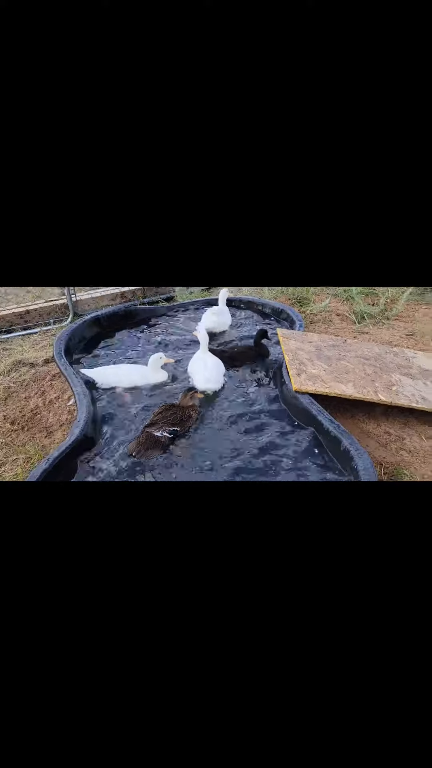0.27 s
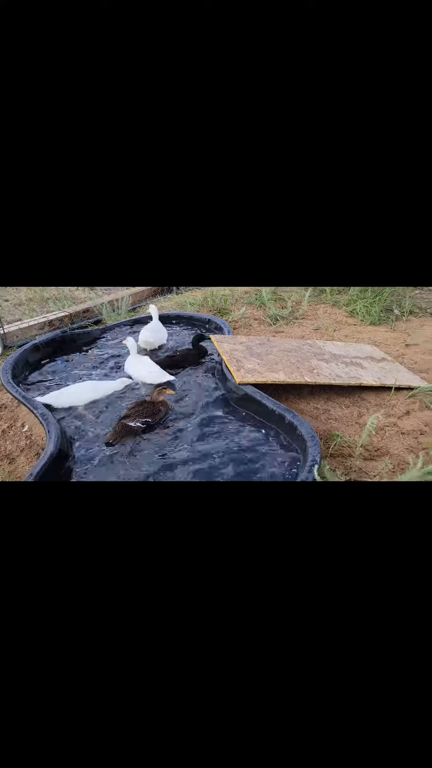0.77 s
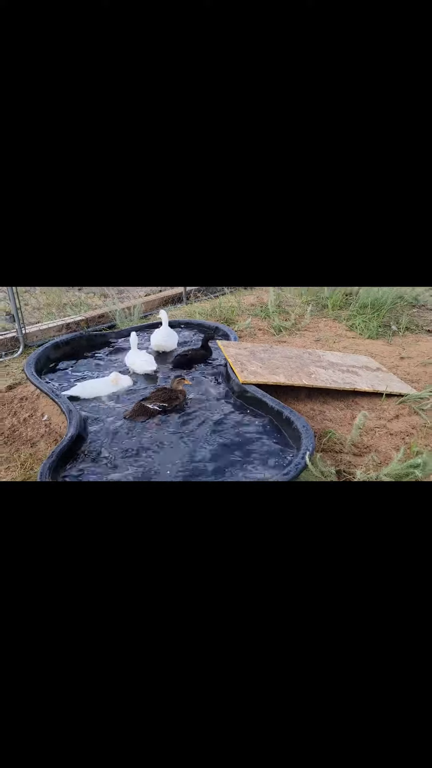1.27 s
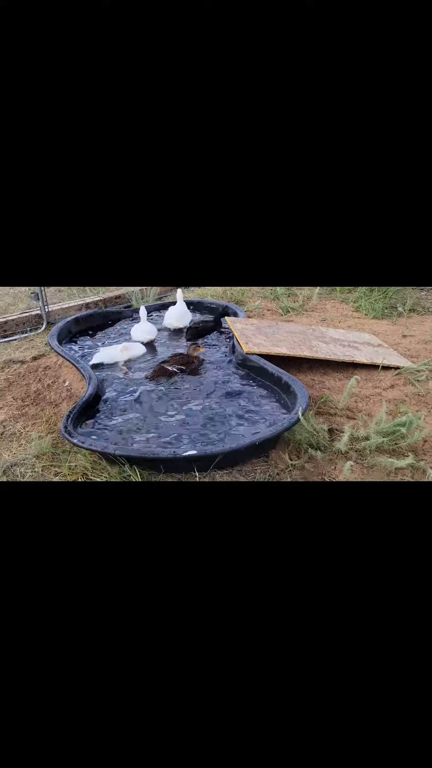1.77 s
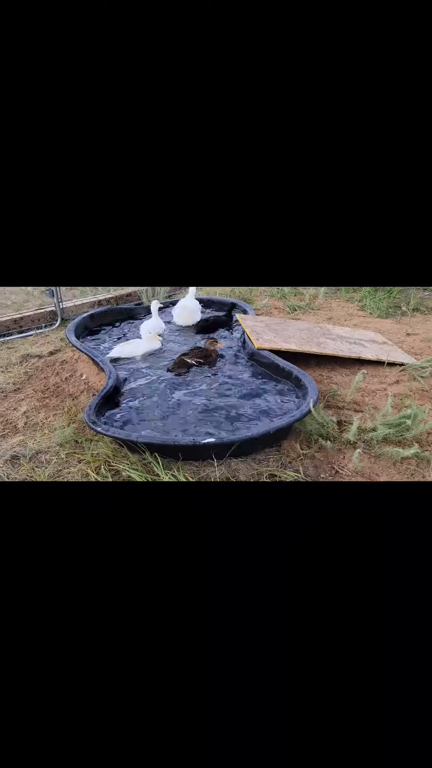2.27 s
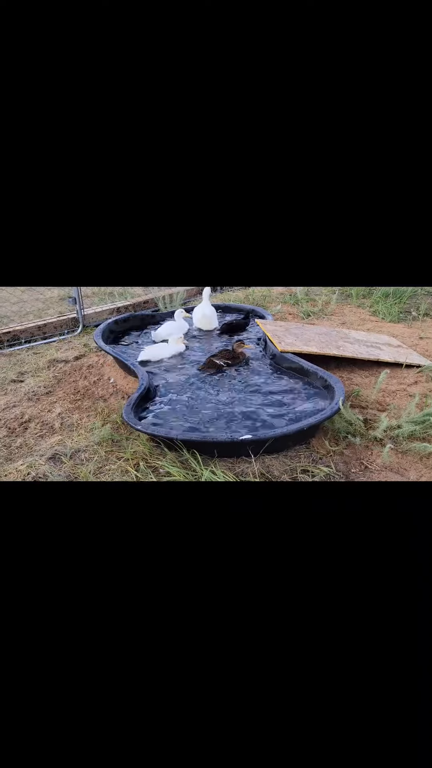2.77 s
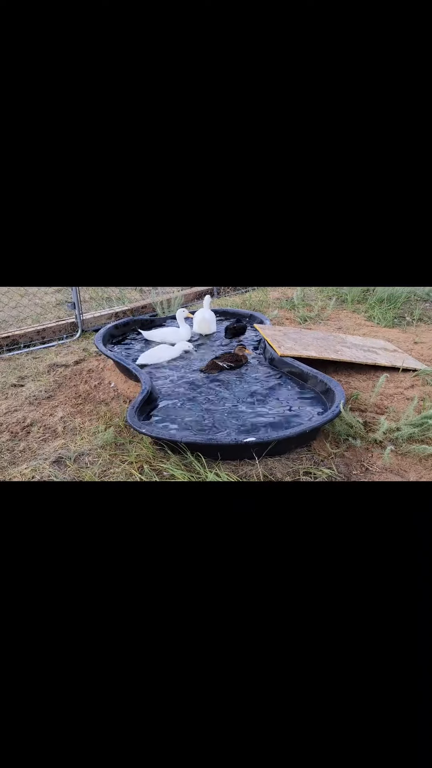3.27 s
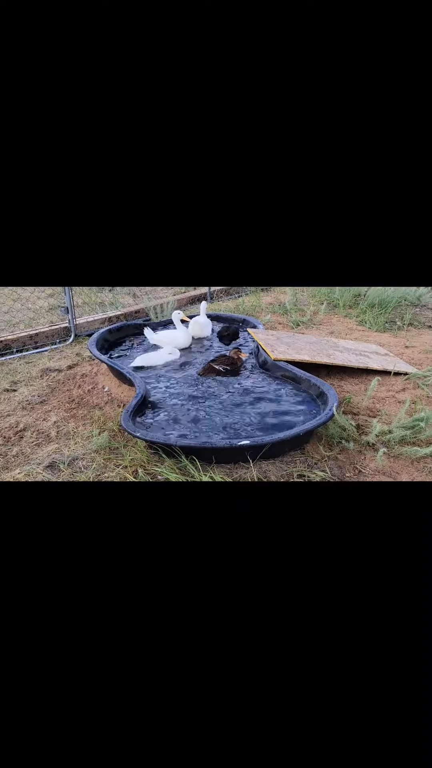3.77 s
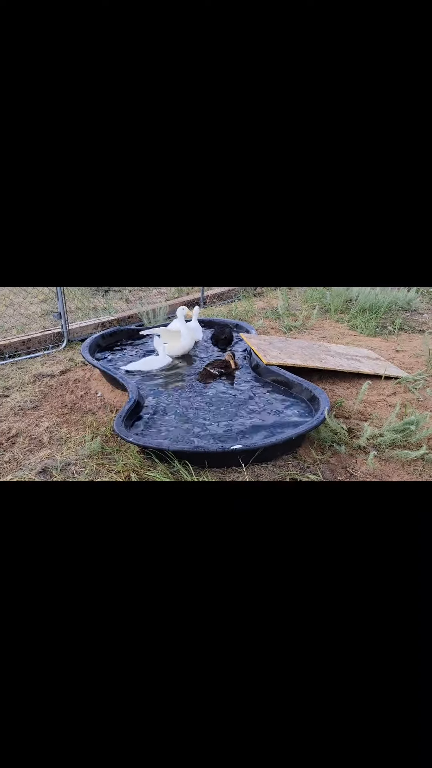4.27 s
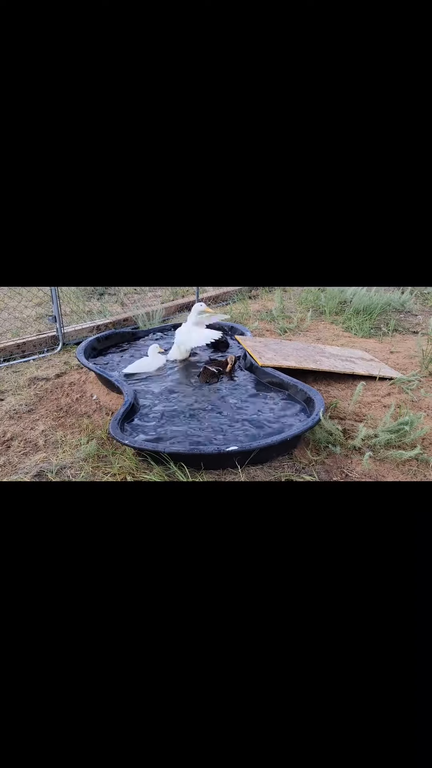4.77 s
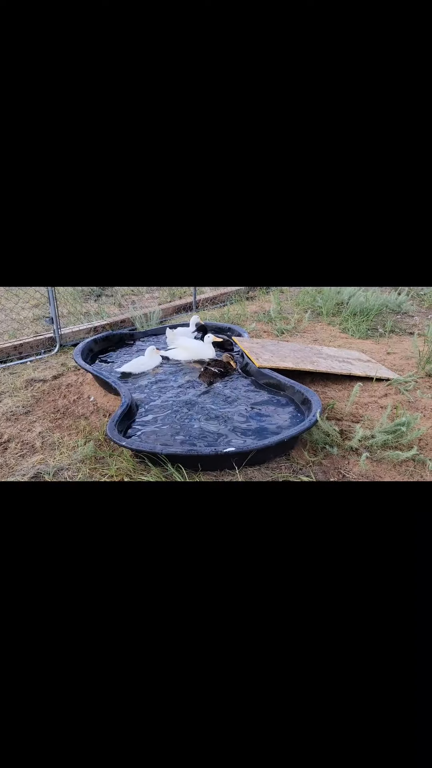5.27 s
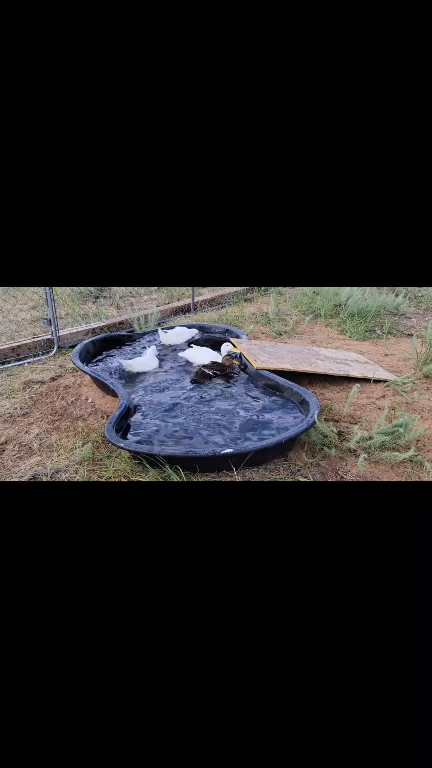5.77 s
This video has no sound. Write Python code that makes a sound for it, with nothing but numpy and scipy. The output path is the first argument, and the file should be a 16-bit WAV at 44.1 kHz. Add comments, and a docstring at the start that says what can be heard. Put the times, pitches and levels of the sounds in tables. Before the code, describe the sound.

An open, breezy yard with ducks in a shallow plastic pond, close and nearly dry apart from short reflections off ground and pond wall. Low, uneven wind thumps buffet the stereo microphone throughout, one strong around 1.5 s, over faint leaves and distant rumble. From 0 to 2 s the ducks chatter busily: short rounded clucks, hoarse fluttering rasps and sliding gulps and whistles, with a bright splash and feather rustle at 0.6 s and another splash near 1.8 s. From 2 to 3.2 s come thin peeps, sparser clucks and a splash at 2.6 s. Around 3.4 to 3.9 s rasps and peeps mix with tiny ticking drops. Calls nearly stop after 4 s; drops, bubbling splashes and wing-stirred water build from 4.5 to 5.3 s. Clucks resume from 5.3 s, a soft quack sounds near 5.7 s, with breathy rasps and a final splashy rustle at 6 s.

```python
"""A breezy yard: ducks paddle and chatter in a shallow plastic pond, to the left of two microphone ports.
Clucks are voice-box pulses ringing the throat and bill, rasps are fluttering noise, peeps are whistled tones.
Ticking drops, bubbling splashes and brushing feathers, made of rings and shaped noise, come from the pond.
A soft quack joins late; leaves and far rumble lie behind, and low lumpy wind noise thumps the ports."""
import sys
import numpy as np
from scipy import signal
from scipy.fft import rfft, irfft, next_fast_len
from scipy.io import wavfile

SR = 44100
rng = np.random.default_rng(int(sys.argv[2]) if len(sys.argv) > 2 else 0)


def output_pcm(signal):
    """Save a mono or channel-first signal as 16-bit PCM at the path in sys.argv[1].

    Samples are clipped to [-1, 1] before scaling.
    """
    pcm = np.clip(np.atleast_2d(signal).T, -1, 1) * 32767
    wavfile.write(sys.argv[1], SR, np.round(pcm).astype(np.int16))


N = 264864

PULSE_HZ = 221.94   # average rate of the voice-box pulses
FLICK_S = 0.017   # the last stretch of a held peep, in which its pitch bends


def from_db(db):
    """Turns decibels into a plain multiplier."""
    return 10 ** (np.asarray(db) / 20)


def rms_one(x):
    """Scales a sound so that its average strength (rms) is 1."""
    return x / np.sqrt(np.mean(x ** 2) + 1e-20)


def in_time(rows, first=0, size=N):
    """Reads each column of a (time, ...) table at every sample from first on."""
    s, *columns = np.transpose(rows)
    times = (first + np.arange(size)) / SR
    return [np.interp(times, s, column) for column in columns]


def span(rows):
    """Gives the first sample, the length and a soft-edged window of a short curve."""
    first = int(rows[0][0] * SR)
    size = int(rows[-1][0] * SR) - first
    return first, size, signal.windows.tukey(size, .3)


def add(out, first, x, pan_db=0):
    """Mixes a sound into both sides; pan_db is how much louder the left is."""
    x = x[:N - first]
    sides = from_db(np.outer([.5, -.5], pan_db)[:, :len(x)])
    out[:, first:first + len(x)] += x * sides


def drift(rate, channels=1):
    """Makes slow chance wandering of rms 1: noise smoothed twice, with cutoff rate in Hz."""
    # worked out at every 40th sample, then joined by straight lines
    r = np.exp(-80 * np.pi * rate / SR)
    noise = rng.standard_normal((channels, N // 40 + 502))
    slow = signal.lfilter([1], [1, -2 * r, r * r], noise)[:, 500:]
    return np.array([np.interp(np.arange(N) / 40, np.arange(len(s)), rms_one(s)) for s in slow])


def resonance(x, hz, width_hz):
    """Rings like a hollow: each click starts a fading tone of about its own height."""
    r, w = np.exp(-np.pi * width_hz / SR), 2 * np.pi * hz / SR
    return signal.lfilter([0, np.sin(w)], [1, -2 * r * np.cos(w), r * r], x)


def coloured(white, spectrum):
    """Shapes noise by a table of (frequency, level), read on a log-frequency axis; rms 1."""
    hz, db = np.transpose(spectrum)
    size = next_fast_len(N)
    grid = np.maximum(np.arange(size // 2 + 1) * SR / size, 1)
    gain = from_db(np.interp(np.log(grid), np.log(hz), db))
    return rms_one(irfft(rfft(white, size) * gain, size)[..., :N])


def grains(spectrum, spread_db, apart):
    """Noise of uneven size in clumps, like dense impacts; partly shared by both sides, rms 1."""
    sizes = from_db(spread_db * np.minimum(rng.exponential(1, N), 5))
    white = rng.standard_normal((3, N)) * sizes
    clumps = from_db(1.5 * drift(25) + 2.0 * drift(80))
    return rms_one(clumps * coloured(white[0] + apart * white[1:], spectrum))


def wind():
    """Eddies thump the ports in lumps, partly the same on both; the hardest thumps flatten."""
    # gusts: (time [s], level before flattening [dB])
    gust_levels = [(0.0, -51.5), (0.06, -33.5), (0.1, -43), (0.55, -49.5), (0.77, -36), (1.02, -41),
                   (1.07, -36), (1.24, -49.5), (1.3, -32), (1.5, -45.5), (1.55, -26), (1.6, -46),
                   (2.09, -35.5), (2.22, -44), (2.86, -37), (2.97, -46), (3.41, -35.5), (3.51, -45),
                   (3.61, -33.5), (3.64, -47), (4.33, -34), (4.48, -43.5), (4.83, -33), (4.9, -54.5),
                   (5.45, -36), (5.55, -48.5), (6.0, -46.5)]
    # lean of the gusts: (time [s], left minus right [dB])
    gust_sides = [(0.0, 9), (0.45, -3.5), (1.02, 9.5), (1.91, 1), (3.43, 3), (3.53, 2), (6.01, 3.5)]
    # tone of the wind: (frequency [Hz], relative level per Hz [dB])
    wind_colour = [(12, -25.5), (20, -7), (89, 4), (151, -5.5), (258, -17), (544, -38.5), (910, -79.5)]
    top = .13   # highest swing of a thump
    white = rng.standard_normal((3, N))
    lumps = from_db(1.5 * drift(14.5) + 3.8 * drift(17.1, channels=2))
    lean_db = np.outer([.5, -.5], in_time(gust_sides)[0])
    gusts = from_db(in_time(gust_levels)[0] + lean_db)
    thumps = coloured((2.65 * white[0] + white[1:]) * lumps, wind_colour) * gusts
    return top * np.tanh(thumps / top)


def yard():
    """Leaves, ripples and far rumble: shaped noise whose level wavers softly."""
    # tone of the yard: (frequency [Hz], relative level per Hz [dB])
    yard_colour = [(180, -13.5), (300, 3), (715, -1), (1420, 1), (2300, -9.5), (3180, -46), (3720, -61),
                   (7270, -13), (9000, -44.5), (11700, -85)]
    level_db = -73.5
    white = rng.standard_normal((3, N))
    waver_db = 2.5 * drift(3)
    return from_db(level_db + waver_db) * coloured(white[0] + white[1:], yard_colour)


def stirring():
    """Gains of water and of feathers: each flurry swells and dies over the quiet bed."""
    # paddling, shaking and wing beats:
    # (crest time [s], relative water level [dB], relative feather level [dB], dying time [s])
    flurries = [(0.003, -63.5, -62, 0.01), (0.495, -63.5, -66, 0.081), (0.608, -55, -54.5, 0.011),
                (0.639, -70, -76, 0.086), (0.928, -73.5, -67, 0.093), (1.09, -71, -91, 0.039),
                (1.17, -69.5, -94, 0.24), (1.34, -66, -94, 0.039), (1.848, -55.5, -68.5, 0.028),
                (2.05, -69, -71, 0.019), (2.29, -75.5, -72.5, 0.12), (2.6, -56.5, -85, 0.024),
                (2.856, -68.5, -70, 0.087), (3.18, -78, -94, 0.02), (3.488, -71.5, -87, 0.038),
                (3.716, -65, -77, 0.054), (3.846, -64.5, -71, 0.078), (4.035, -68, -73.5, 0.047),
                (4.156, -66.5, -76, 0.0086), (4.253, -74, -68, 0.0065), (4.521, -70.5, -84, 0.083),
                (4.598, -63, -73, 0.061), (4.653, -66, -78, 0.0088), (4.781, -61.5, -68, 0.064),
                (4.959, -57.5, -65.5, 0.074), (5.084, -58, -66.5, 0.048), (5.28, -62, -70.5, 0.03),
                (5.48, -73.5, -82, 0.033), (5.58, -74, -67, 0.0099), (5.68, -68.5, -72, 0.011),
                (5.894, -63, -62.5, 0.035), (6.0, -57.5, -64, 0.062)]
    # lapping and rustling between them: (time [s], relative water level [dB], relative rustle level [dB])
    quiet_bed = [(0, -80, -82.5), (1.3, -76, -80.5), (2.2, -75.5, -78.5), (3.0, -78.5, -90),
                 (3.9, -90, -96), (4.3, -77.5, -78.5), (5.3, -85, -83), (6.01, -63.5, -85.5)]
    rise_share = .4   # the swell takes this share of the dying time
    roundness = 1.3   # 1 = pointed crest, 2 = bell
    t = np.arange(N) / SR
    power = from_db(in_time(quiet_bed)) ** 2
    for s, water_db, feather_db, dying in flurries:
        pace = np.where(t < s, rise_share * dying, dying)
        shape = np.exp(-2 * abs((t - s) / pace) ** roundness)
        power = power + from_db([[water_db], [feather_db]]) ** 2 * shape
    return np.sqrt(power)


def splash(gain):
    """Droplet impacts, made of grainy noise, with small bubbles ringing under them."""
    # tone of the impacts: (frequency [Hz], relative level per Hz [dB])
    splash_colour = [(290, 7.5), (500, 1.5), (936, -5.5), (1190, -5), (1300, -8.5), (1640, -1.5),
                     (4770, -10), (10000, -18), (13000, -108)]
    bubbles_per_s, bubble_share = 220, 0.62
    born = (rng.random(N) < bubbles_per_s / SR) * from_db(4 * rng.standard_normal(N))
    # each bubble is dealt one of 14 pitches
    dealt = rng.integers(0, 14, N)
    bubbles = 0
    for k, hz in enumerate(np.geomspace(550, 4500, 14)):
        bubbles = bubbles + resonance(born * (dealt == k) + 1e-18, hz, hz / 16)
    impacts = grains(splash_colour, spread_db=3.5, apart=3.6)
    water = impacts + bubble_share * rms_one(bubbles)
    return gain * from_db([[5], [8]]) * water   # left, right [dB]


def rustle(gain):
    """Dry blades and wet feathers brush and crackle: grainy bright noise with tiny spits."""
    # tone of the rustle: (frequency [Hz], relative level per Hz [dB])
    rustle_colour = [(2350, -39), (4000, -13.5), (4690, -9), (7400, 8.5), (8600, 6), (10300, -2),
                     (12700, 7.5), (14300, 4), (15600, 0)]
    flecks_per_s, fleck_share = 70, .6   # lone droplets flung off the feathers
    flecks = (rng.random(N) < flecks_per_s / SR) * from_db(4 * rng.standard_normal((2, N)))
    # each fleck is a half-millisecond spit
    flecks = signal.lfilter([1], [1, -.96], flecks) * rng.standard_normal(N)
    brushing = grains(rustle_colour, spread_db=2.0, apart=5.9)
    brushing = brushing + fleck_share * coloured(flecks, rustle_colour)
    return gain * from_db([[-1], [3]]) * brushing   # left, right [dB]


def clucks():
    """A few uneven, rounded pulses of the voice box ring the throat and, with the bill open, its higher hollows."""
    # (time [s], relative level [dB], settled throat pitch [Hz], relative open-bill level [dB], length [s])
    cluck_list = [(0.123, -43, 414, -23, 0.036), (0.175, -37.5, 425, -20, 0.016),
                  (0.325, -39.5, 507, -15, 0.013), (0.4, -35, 760, -9.5, 0.032),
                  (0.477, -38.5, 462, -17, 0.022), (0.533, -46.5, 815, -1.5, 0.022),
                  (0.603, -29, 890, -9, 0.023), (0.659, -36.5, 525, -13.5, 0.011),
                  (0.825, -40, 520, -20, 0.013), (0.873, -37.5, 534, -17.5, 0.032),
                  (1.025, -49, 830, -27, 0.012), (1.096, -35.5, 590, -20, 0.022),
                  (1.209, -35.5, 520, -27, 0.012), (1.316, -36.5, 650, -15, 0.037),
                  (1.361, -32, 636, -29, 0.013), (1.51, -37.5, 607, -55, 0.013),
                  (1.568, -39, 574, -16.5, 0.02), (1.64, -40.5, 901, -9.5, 0.03),
                  (1.773, -51.5, 890, -31, 0.028), (1.842, -33, 850, -4.5, 0.022),
                  (1.982, -54, 910, -13, 0.024), (2.048, -36, 1000, -9.5, 0.028),
                  (2.429, -39.5, 650, -4.5, 0.025), (2.593, -30, 865, -3.5, 0.023),
                  (2.87, -46, 757, -14, 0.024), (3.075, -35, 620, -21, 0.0081),
                  (3.125, -32.5, 678.6, -18.5, 0.018), (5.267, -35, 610, -38, 0.016),
                  (5.335, -43, 610, -30, 0.019), (5.568, -45, 660, -15, 0.012),
                  (5.614, -52, 700, -14, 0.079), (5.73, -38.5, 860, -11, 0.012),
                  (5.827, -41, 840, -11.5, 0.023)]
    # hollows of the open bill: (average frequency [Hz], width [Hz], relative level [dB])
    bill_hollows = [(1414, 163, 6), (1750, 350, 2.5), (2102, 114, -0.5), (3300, 1400, -16),
                    (5740, 350, -6.5)]
    pulse_jitter = 0.22   # scatter of the pulses, in periods
    crest_share, swell_db_per_ms = .1, -.7   # crest as share of the length
    out, lead, size = np.zeros((2, N)), .011, int(.12 * SR)
    t = np.arange(size) / SR
    for s, db, throat_hz, bill_db, length in cluck_list:
        chance = rng.standard_normal((2, 40))
        times = lead + (np.arange(40) - 2 + pulse_jitter * chance[0]) / PULSE_HZ
        heard = (times > 0) & (times < lead + length)
        # the pulses swell to a crest, from further back through an open bill, then fade
        crest = lead + crest_share * length
        swell_db = (swell_db_per_ms + .02 * bill_db) * 1000 * (crest - times)
        fade_db = -14 * (abs(times - crest) / length) ** 1.47
        strength_db = np.where(times < crest, swell_db, fade_db)
        strength = from_db(strength_db + 3.5 * chance[1])[heard]
        starts = (times[heard] * SR).astype(int)
        pulses = np.zeros(size)
        pulses[starts] = strength
        # air hisses along with each pulse
        pulses += .08 * signal.lfilter([1], [1, -.98], pulses) * rng.standard_normal(size)
        # soft tissue rounds each pulse
        pulses = signal.lfilter([.09], [1, -1.4, .49], pulses)
        # the bill opens a little differently each time
        gape = 1 + .04 * chance[0, -1]
        bill = 0
        for k, (hz, width_hz, hollow_db) in enumerate(bill_hollows):
            bill = bill + from_db(hollow_db) * resonance(pulses, hz * gape, width_hz) * (-1) ** k
        # the throat lengthens as the cluck starts, so its ring slides down
        turns = np.cumsum(throat_hz * 2 ** (0.9 * np.exp(-t / 0.006))) / SR
        since = np.maximum(t - times[heard, None], 0)
        phase = 2 * np.pi * (turns - turns[starts, None]) * (since > 0)
        onset = 1 - np.exp(-since / 0.001)
        low_ring = np.sin(phase) * np.exp(-since / 0.0018)
        high_ring = 3.4 * np.sin(1.35 * phase) * np.exp(-since / 0.00039)
        throat = strength @ (onset * (low_ring + high_ring))
        cluck = from_db(db + 7.5) * (throat - from_db(bill_db) * bill)
        add(out, int((s - lead) * SR), cluck, -.6)
    return out


def notes():
    """Lists every whistled note as (time [s], pitch [Hz], level [dB]) points."""
    # held peeps, bent at the end: (start [s], length [s], pitch [Hz], end pitch [Hz], crest level [dB])
    held_peeps = [(2.125, 0.071, 1610, 1630, -52), (2.255, 0.025, 1603, 1860, -60),
                  (2.305, 0.03, 1583, 1750, -63.5), (2.351, 0.077, 1424, 1500, -49),
                  (2.476, 0.037, 1450, 1550, -47), (2.538, 0.03, 1440, 1650, -48.5),
                  (3.662, 0.012, 1630, 1390, -45), (3.787, 0.097, 1513, 1510, -64.5),
                  (3.85, 0.076, 1478, 1806, -50.5), (4.301, 0.028, 816, 860, -62.5),
                  (4.813, 0.035, 1434, 1480, -57), (5.828, 0.0083, 1820, 1840, -38.5)]
    # sliding notes, gulps when they fall fast:
    # (start [s], length [s], from pitch [Hz], to pitch [Hz], starting level [dB])
    slides = [(0.128, 0.011, 767, 960, -59), (0.27, .06, 2200, 2590, -67.5),
              (0.301, 0.048, 1414, 465, -53.5), (0.36, 0.078, 1343, 1595, -59.5),
              (0.395, 0.0089, 1230, 790, -45), (0.416, 0.029, 1253, 1830, -46.5),
              (0.471, 0.024, 1150, 484, -52.5), (1.302, 0.028, 1140, 670, -47.5),
              (1.324, 0.059, 699, 624, -49.5), (1.346, 0.026, 1675, 1236, -48),
              (1.525, 0.052, 1462, 1850, -58), (2.058, 0.035, 732, 640, -50),
              (2.376, 0.02, 1630, 2040, -50.5), (2.572, 0.016, 1940, 900, -44),
              (4.78, 0.044, 794, 1400, -61), (5.317, 0.023, 1012, 560, -56),
              (5.405, 0.019, 1650, 1390, -65)]
    # an arched whistle, strongest at its start: (time [s], pitch [Hz], level [dB])
    whistle = [(1.335, 1766, -16), (1.352, 2550, -70.5), (1.385, 2400, -70), (1.405, 2020, -51),
               (1.435, 1400, -70)]
    start_db, end_db, crest_share = -12.5, -3.5, .5   # levels against the crest
    slide_fade_db = -0.5
    held = []
    for s, length, hz, end_hz, db in held_peeps:
        bend = length - FLICK_S
        held.append([(s, hz, db + start_db), (s + min(crest_share * length, bend), hz, db),
                     (s + bend, hz, db + end_db / 2), (s + length, end_hz, db + end_db)])
    sliding = [[(s, start_hz, db), (s + length, end_hz, db + slide_fade_db)]
               for s, length, start_hz, end_hz, db in slides]
    return held + sliding + [whistle]


def peeps():
    """Whistled notes: nearly pure tones, a little unsteady in breath and pitch."""
    hoarse_per_octave, hoarse_most, hoarse_hz = 2.5, .28, 220   # the cap holds at 1200 Hz
    out = np.zeros((2, N))
    breath, waver = from_db(2.0 * drift(40)[0]), 1 + .004 * drift(90)[0]
    for rows in notes():
        first, size, window = span(rows)
        here = slice(first, first + size)
        hz, db = in_time(rows, first, size)
        phase = 2 * np.pi * np.cumsum(hz * waver[here]) / SR
        # a fast slide breaks up into voice-box pulses
        broken = np.clip(abs(np.log2(hz[-1] / hz[0])) / (size / SR) / 40, 0, .3)
        pulse_phase = 2 * np.pi * PULSE_HZ * np.cumsum(waver[here] ** 8) / SR
        window = window * (1 + broken * np.sin(pulse_phase))
        # breath noise grows with the octaves covered, the last flick aside; higher notes may have more
        steady = hz[:-int(FLICK_S * SR)]
        glide = np.log2(steady.max(initial=hz[0]) / steady.min(initial=hz[0]))
        low_pass = signal.butter(2, hoarse_hz, fs=SR, output="sos")
        air = signal.sosfilt(low_pass, rng.standard_normal(size))
        hoarse = min(hoarse_per_octave * glide, hoarse_most * (hz.mean() / 1200) ** 2)
        window = window * (1 + hoarse * rms_one(air))
        note = breath[here] * window * (np.sin(phase) + 0.014 * np.sin(2 * phase))
        add(out, first, np.sqrt(2) * from_db(db) * note, -5.0)
    return out


def rasps():
    """Turbulent air in a narrow windpipe: fluttering noise around gliding resonances, with breathy bands above."""
    # (start [s], length [s], crest level [dB], crest resonance [Hz], left minus right [dB])
    rasp_list = [(0.141, 0.06, -55, 1650, -5), (0.197, 0.11, -49.5, 1506, -1),
                 (0.488, 0.07, -43.5, 1420, -2), (0.845, 0.11, -46, 1439, -1), (0.62, 0.034, -60, 3730, 0),
                 (1.078, 0.048, -65, 3230, 3), (1.148, 0.06, -53, 2200, -9), (1.129, 0.12, -48.5, 1610, -1),
                 (1.208, 0.067, -39, 1437, 0), (1.294, 0.048, -58.5, 3630, -1),
                 (1.422, 0.031, -65, 1820, -11), (2.632, 0.046, -48, 1433, -3.5),
                 (2.772, 0.11, -65, 3010, -2), (2.928, 0.051, -43, 1476, 4), (3.155, 0.059, -41, 1494, 2),
                 (3.432, 0.044, -56.5, 960, -6), (3.454, 0.062, -42, 1744, -2.5),
                 (3.676, 0.072, -43.5, 1800, -4.5), (3.695, 0.046, -60.5, 1106, -7),
                 (3.797, 0.071, -75, 3160, 8), (4.862, 0.042, -54.5, 1336, 0),
                 (5.603, 0.078, -66.5, 2900, 8), (5.758, 0.057, -63, 3300, 0),
                 (5.778, 0.041, -55.5, 1216, -2), (5.859, 0.12, -56.5, 950, -2),
                 (5.877, 0.019, -52, 3100, -2)]
    # gliding resonances: (multiple of the resonance [ratio], width before blurring [Hz], relative level [dB])
    rasp_tones = [(1, 96, 5.5), (1.219, 114, -4)]
    # breathy bands: (frequency [Hz], width of each of two filter passes [Hz], relative level [dB])
    rasp_hiss = [(1400, 940, -8.5), (2044, 260, -3.5), (3270, 3900, -18), (4168, 140, -21),
                 (5270, 970, -14)]
    crest_share, start_db, end_db = 0.63, -7, -16.5   # levels against the crest
    sag = 0.93   # the resonance sinks to this share at both ends
    clear_hz, firm_db = 1700, -41   # higher or weaker rasps blur into hiss
    out, grain = np.zeros((2, N)), from_db(4.0 * drift(60)[0])
    for s, length, peak_db, top_hz, pan_db in rasp_list:
        rows = [(s, peak_db + start_db, top_hz * sag), (s + crest_share * length, peak_db, top_hz),
                (s + length, peak_db + end_db, top_hz * sag)]
        first, size, window = span(rows)
        db, hz = in_time(rows, first, size)
        phase, voice = 2 * np.pi * np.cumsum(hz) / SR, 0
        blur = max((top_hz / clear_hz) ** 3, from_db(.7 * (firm_db - peak_db)), 1)
        for multiple, width_hz, tone_db in rasp_tones:
            r = np.exp(-np.pi * width_hz * min(blur, 8) / SR)
            noise = rng.standard_normal((2, size + 2000))
            a, b = signal.lfilter([1], [1, -2 * r, r * r], noise)[:, 2000:]
            tone = a * np.cos(multiple * phase) + b * np.sin(multiple * phase)
            # the airflow evens out the loudest swells
            tone = tone / np.sqrt(np.hypot(a, b) + 1e-9)
            voice = voice + from_db(tone_db) * rms_one(tone)
        for hiss_hz, width_hz, hiss_db in rasp_hiss:
            hiss = resonance(rng.standard_normal(size), hiss_hz, width_hz)
            hiss = resonance(hiss, hiss_hz, width_hz)
            voice = voice + from_db(hiss_db) * rms_one(hiss)
        # loose membranes chop the airflow into uneven grains
        flutter = (1 + 0.45 * np.sin(phase / 8.0)) * grain[first:first + size]
        add(out, first, from_db(db) * window * rms_one(voice * flutter), pan_db)
    return out


def drops():
    """Each drop or slap is a sharp tick, a short ring and a puff of spray."""
    # (time [s], relative level [dB], ring pitch [Hz])
    drop_list = [(1.074, -53, 3070), (1.137, -50, 3620), (1.166, -41, 5660), (1.293, -49, 3270),
                 (2.594, -44.5, 6600), (3.354, -60, 3200), (3.37, -55.5, 3330), (3.403, -58, 3130),
                 (3.433, -43.5, 2020), (3.6654, -46.5, 5040), (3.733, -50, 3200), (3.746, -50.5, 3200),
                 (3.8113, -57, 3200), (3.8493, -48.5, 3130), (4.139, -50, 3050), (4.503, -43, 1940),
                 (4.515, -45, 2730), (4.528, -44, 2810), (4.578, -42, 1970), (4.579, -43, 5860),
                 (4.593, -49, 1890), (4.644, -38.5, 3270), (4.781, -40, 6210), (4.782, -44.5, 793),
                 (4.905, -41, 4170), (4.956, -54, 4666), (4.996, -47.5, 774), (5.061, -42.5, 4168),
                 (5.069, -44, 854), (5.098, -50, 3550), (5.117, -50, 1290), (5.131, -53, 3130),
                 (5.301, -50.5, 5700), (5.455, -50.5, 5140), (5.765, -50, 3520), (5.8817, -40.5, 6800),
                 (5.948, -42.5, 7440)]
    spray_cut = 1.13   # spray dulls above this multiple of the ring
    ring_cycles = 8.0   # the ring falls to about a third in this many cycles
    out, t = np.zeros((2, N)), np.arange(int(0.025 * SR)) / SR
    for s, db, hz in drop_list:
        spray = rng.standard_normal(len(t)) * (np.exp(-t / .0008) + .2 * np.exp(-t / .006))
        low_pass = signal.butter(2, min(spray_cut * hz, SR / 2.2), fs=SR, output="sos")
        spray = signal.sosfilt(low_pass, spray)
        ring = np.sin(2 * np.pi * hz * t) * np.exp(-t * hz / ring_cycles) * np.tanh(t * hz / 2)
        add(out, int(s * SR), from_db(db) * (0.6 * spray + ring), -2.5)
    return out


def quack():
    """One soft clear quack: ten rough harmonics, the third strongest as it sits in the throat's resonance."""
    # (time [s], pitch [Hz], relative level [dB])
    quack_curve = [(5.645, 350, -60), (5.67, 325.8, -53), (5.705, 344, -55.5), (5.73, 193, -45),
                   (5.74, 167, -48)]
    # harmonics 1 to 10, one each: relative level [dB]
    harmonics_db = [-13, -19, 2.5, -3.5, -12, -4.5, -18, -23, -32, -24]
    out = np.zeros((2, N))
    first, size, window = span(quack_curve)
    hz, db = in_time(quack_curve, first, size)
    phase = 2 * np.pi * np.cumsum(hz) / SR
    rough = from_db(3.2 * drift(80, channels=10)[:, first:first + size])
    voice = 0
    for k, tone_db in enumerate(harmonics_db):
        voice = voice + from_db(tone_db) * rough[k] * np.sin((k + 1) * phase)
    add(out, first, np.sqrt(2) * from_db(db) * window * voice, -3.0)
    return out


def at_ports(x):
    """Ground and pond wall throw short echoes, the yard a faint dull tail; the right port lags above the bass."""
    # echoes: (left delay [s], right delay [s], level [dB])
    echoes = [(.0012, 0.0023, -24), (.0067, 0.0058, -8.5), (.017, .023, -21)]
    # lag of the right port: (frequency [Hz], phase lag [radians])
    port_phase = [(0, 0), (950, .3), (1250, 1.3), (1800, 1.8), (2400, 5.6), (3400, 6.6), (22050, 37.7)]
    # gain of the right port: (frequency [Hz], level [dB])
    port_level = [(1200, 1.14), (2800, -2.5), (5500, 2.5), (9500, -3.5), (13500, 0.5)]
    scatter_db, scatter_t60_s, scatter_band_hz = -46, 0.23, (500, 4300)   # level ahead of the band filter
    out = x.copy()
    for left, right, db in echoes:
        for side, s in enumerate((left, right)):
            delay = int(s * SR)
            out[side, delay:] += from_db(db) * x[side, :N - delay]
    # the tail is noise that dies by 60 dB in scatter_t60_s
    fade_db = scatter_db - 60 * np.arange(SR // 2) / SR / scatter_t60_s
    tail = rng.standard_normal((2, SR // 2)) * from_db(fade_db)
    tail = signal.sosfilt(signal.butter(1, scatter_band_hz, "band", fs=SR, output="sos"), tail)
    out += signal.fftconvolve(x, tail, axes=1)[:, :N]
    size = next_fast_len(N)
    grid = np.arange(size // 2 + 1) * SR / size
    late = np.interp(grid, *np.transpose(port_phase))
    gain = from_db(np.interp(grid, *np.transpose(port_level)))
    out[1] = irfft(rfft(out[1], size) * gain * np.exp(-1j * late), size)[:N]
    return out


def scene():
    """The pond heard across the yard, under the wind."""
    ducks = clucks() + rasps() + peeps() + quack()
    water, feathers = stirring()
    pond = drops() + splash(water) + rustle(feathers)
    return at_ports(ducks + pond + yard()) + wind()


def record(dry):
    """The microphone cavity dips near 4 kHz; the top is cut steeply."""
    dip = dry - .45 * signal.lfilter(*signal.iirpeak(3950, 5, fs=SR), dry)
    # everything from 15750 Hz up is at least 60 dB down
    return signal.sosfilt(signal.cheby2(24, 60, 15750, fs=SR, output="sos"), dip)


dry = scene()
out = record(dry)
output_pcm(out)
```